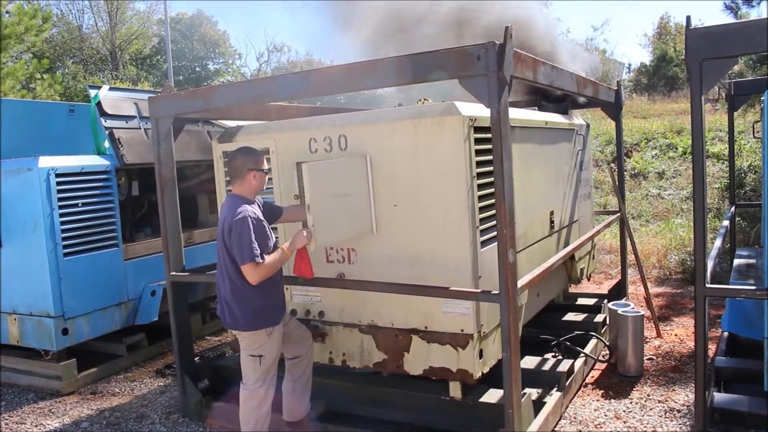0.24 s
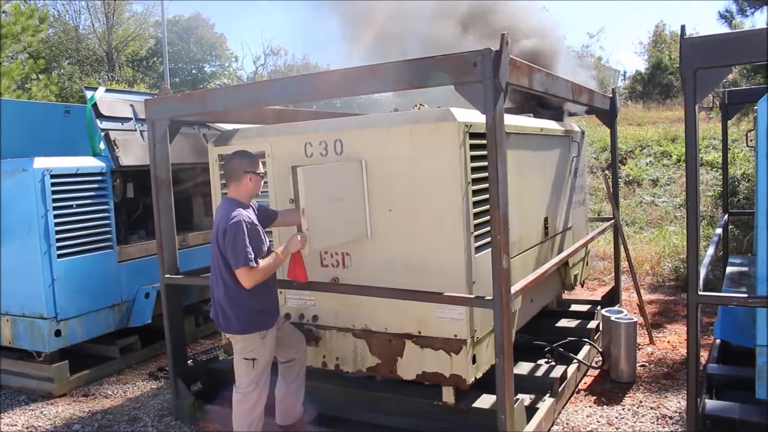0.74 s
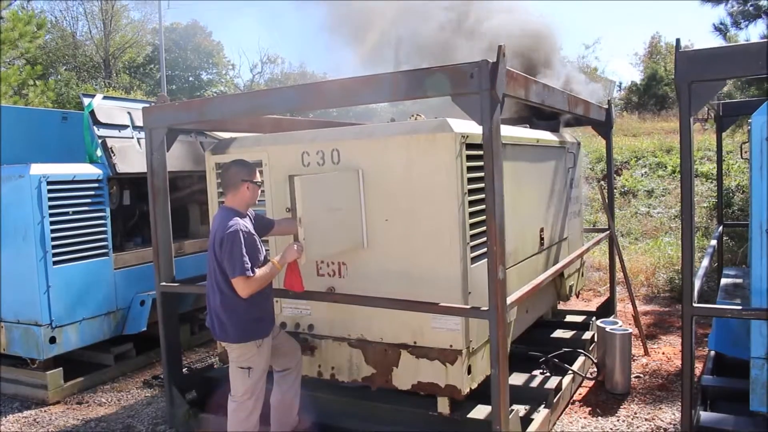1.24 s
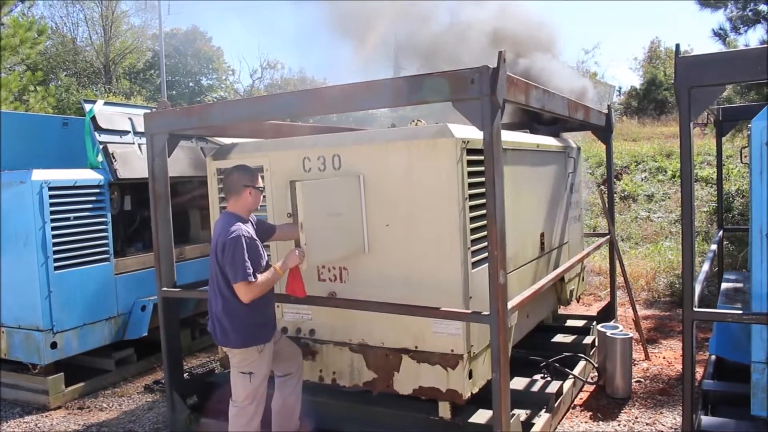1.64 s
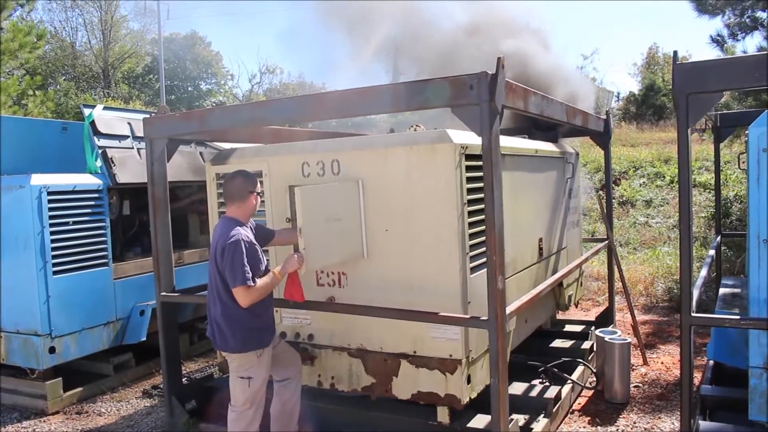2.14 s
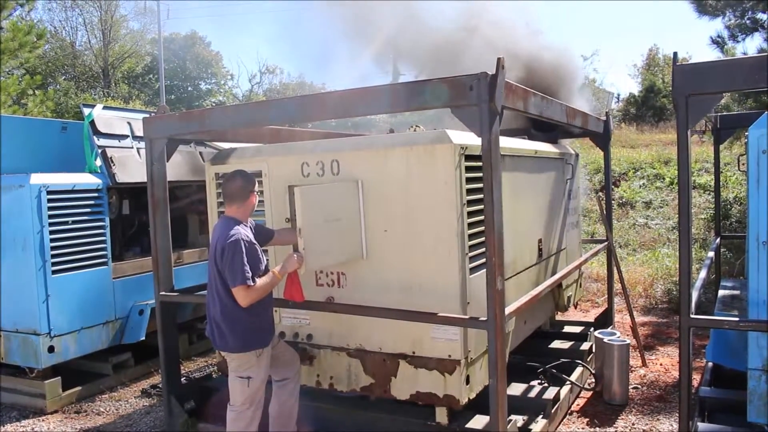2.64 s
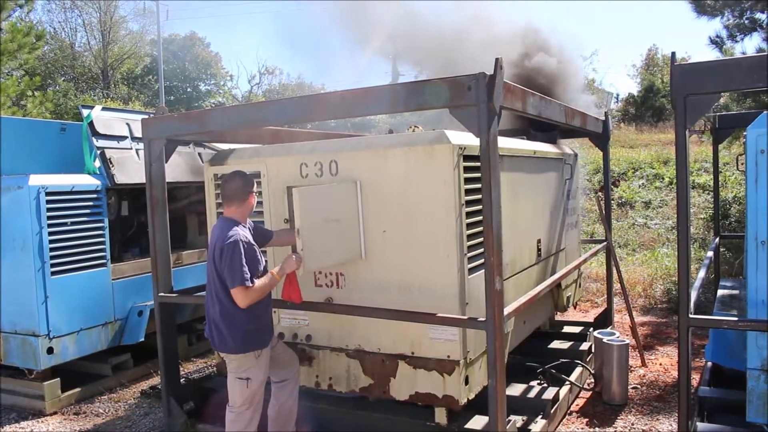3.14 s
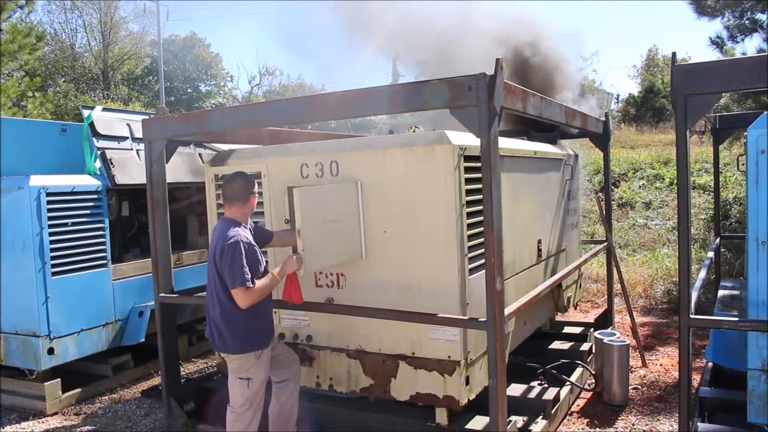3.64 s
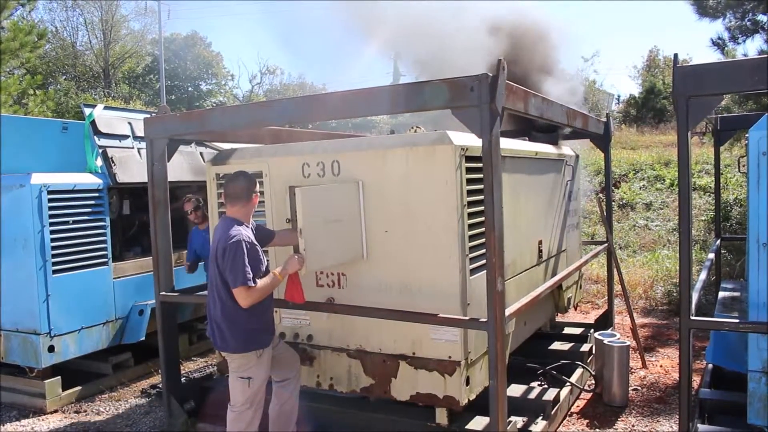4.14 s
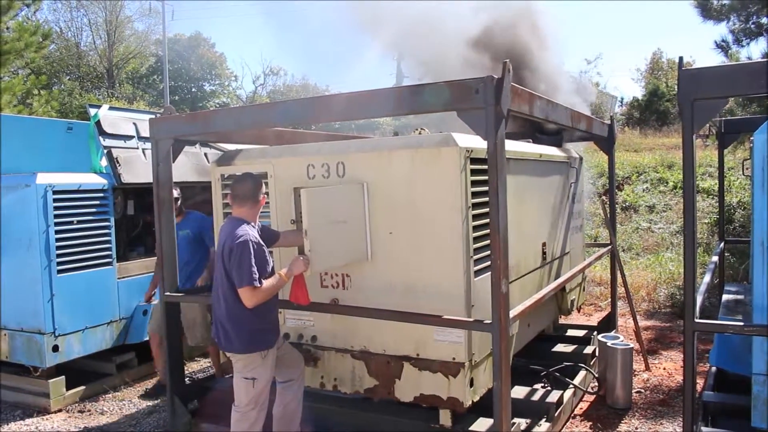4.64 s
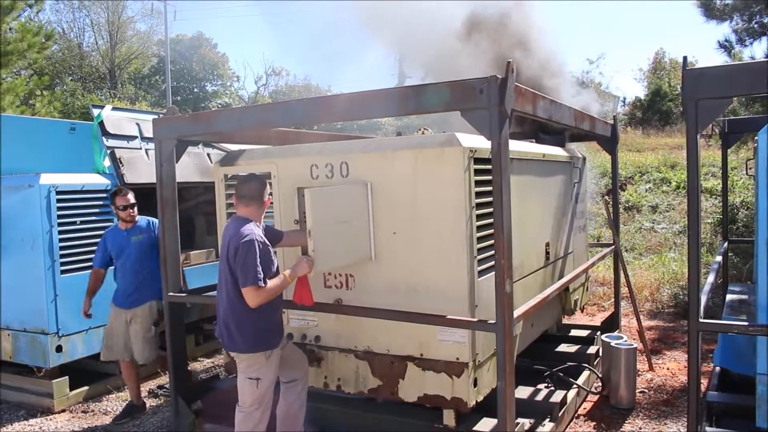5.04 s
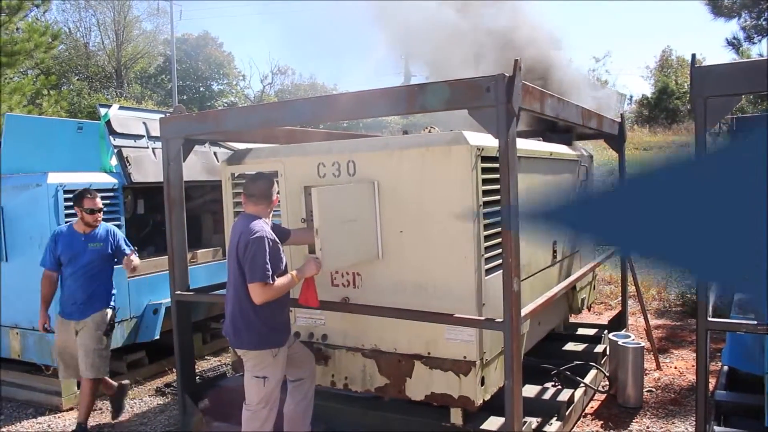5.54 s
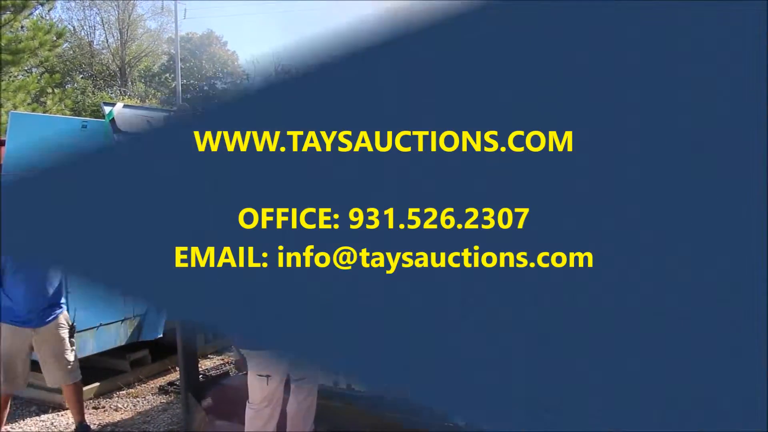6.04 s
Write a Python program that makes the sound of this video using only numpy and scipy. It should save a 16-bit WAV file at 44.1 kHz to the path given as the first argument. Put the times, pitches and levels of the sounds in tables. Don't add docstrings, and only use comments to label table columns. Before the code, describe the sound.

Steady rough diesel engine drone with gear hum, metallic knocks and fan roar in an open yard, gusts thumping, gradually fading towards silence.

```python
import sys
import numpy as np
from scipy import signal
from scipy.io import wavfile
from scipy.ndimage import uniform_filter1d

SR = 44100
rng = np.random.default_rng(int(sys.argv[2]) if len(sys.argv) > 2 else 0)


def convert_level_to_amplitude(level_db):
    exponent = np.asarray(level_db, float) / 20
    return 10 ** exponent


def bounce(signal):
    frames = np.transpose(np.atleast_2d(signal))
    limited = np.clip(frames, -1, 1)
    pcm = np.round(limited * 32767).astype(np.int16)
    wavfile.write(sys.argv[1], SR, pcm)


N = 276939


def evened(x):
    return x / np.sqrt(np.mean(abs(x) ** 2) + 1e-20)


def read(points, hz):
    f, value = np.transpose(points)
    return np.interp(np.log(hz + 1), np.log(f + 1), value)


def curve(rows):
    return np.interp(np.arange(N) / SR, *np.transpose(rows))


def drift(hz, count):
    steps = N // 64 + 2
    z = rng.standard_normal((count, steps)) + 1j * rng.standard_normal((count, steps))
    smoothing = 1 + (np.fft.fftfreq(steps, 64 / SR) / hz) ** 2
    z = np.fft.ifft(np.fft.fft(z) / smoothing)
    return [np.interp(np.arange(N) / 64, np.arange(steps), evened(row)) for row in z]


def coloured(x, points, patchy_db=0., size=2048):
    hz, t, z = signal.stft(x, SR, nperseg=size, noverlap=size * 3 // 4)
    patches = rng.standard_normal(z.shape[-2:])
    patches = uniform_filter1d(patches, size=12, axis=0)
    patches = evened(uniform_filter1d(patches, size=8, axis=1))
    gain = convert_level_to_amplitude(read(points, hz)[:, None] + patchy_db * patches) * np.sqrt(SR / 2)
    return signal.istft(z * gain, SR, nperseg=size, noverlap=size * 3 // 4)[1][..., :N]


def ring(x, hz, width_hz):
    r = np.exp(-np.pi * width_hz / SR)
    return 2 * signal.lfilter([1 - r], [1, -r * np.exp(2j * np.pi * hz / SR)], x).real


def tones(table, cycles, pulse_at, waver_hz, followers=0., free_above=100):
    out, luck = np.zeros(N), rng.random(len(table))
    for (order, db, loose), waver, chance in zip(table, drift(waver_hz, count=len(table)), luck):
        order = np.round(order * 3) / 3
        next_cylinder = np.exp(-2j * np.pi * order / 6)
        pipe_bump = np.exp(-((order - 17) / 4.2) ** 2 - 2j * np.pi * order * .2925)
        pipe_echo = -1.6 * pipe_bump
        muffler_lag = np.exp(-1.3j * followers * np.exp(-((order - 6.5) / 1.2) ** 2))
        pulses = muffler_lag * ((order / 13) ** 2 + followers * (next_cylinder + pipe_echo))
        size = np.sqrt(1 - .7 * loose) + np.sqrt(.7 * loose + .05) * waver
        start = chance * (order > free_above)
        turn = np.exp(2j * np.pi * (order * (cycles - pulse_at) + start))
        out -= np.sqrt(2) * convert_level_to_amplitude(db) * (size * pulses / abs(pulses) * turn).real
    return out


def strikes(parts, cycles, spread_db):
    out, repeats = np.zeros(N), np.arange(-1, int(cycles[-1] / 3) + 1)
    for (hz, t60), pattern in parts:
        blows = np.zeros(N)
        for place, db in pattern:
            luck = rng.standard_normal((len(repeats), 2))
            place_now = 3 * repeats + place + .006 * luck[:, 0]
            at = np.interp(place_now, cycles, np.arange(N), -1, -1).astype(int)
            heard = at > 0
            blows[at[heard]] = convert_level_to_amplitude(db + spread_db * luck[heard, 1])
        t = np.arange(int(t60 * SR)) / SR
        swell = 1 - np.exp(-t / .004)
        shape = convert_level_to_amplitude(-60 * t / t60) * swell * np.sin(2 * np.pi * hz * t)
        out += signal.oaconvolve(blows, shape)[:N]
    return out


# (time_s, speed_cycles_per_s)
ENGINE_SPEED = [
    (0, 11.719),
    (1.0, 11.715),
    (2.2, 11.743),
    (3.4, 11.675),
    (4.0, 11.678),
    (6.28, 11.622),
]


def engine_cycles():
    return np.cumsum(curve(ENGINE_SPEED)) / SR


# (multiple_of_cycle_rate, level_db, unsteady_share_0_to_1)
EXHAUST = [(2, -29, 0), (4, -23, 0), (6, -21, 0), (8, -18, .3), (10, -16, .1), (12, -11, 0), (14, -21, .3),
           (16, -13, 0), (18, -13, .1), (20, -18, .1), (22, -19, .1), (24, -21, .6), (26, -21.5, .3),
           (30, -23, .4), (32, -24, .7), (36, -29, .1), (40, -22, .2), (44, -32, .7), (46, -36, .1),
           (48, -33, .7)]
# (multiple_of_cycle_rate, level_db, unsteady_share_0_to_1)
UNEVEN_FIRING = [(5, -27, 0), (7, -26, .3), (9, -33, 0), (11, -26, .3), (17, -21, .1), (21, -20.5, .7),
                 (23, -18, .3), (27, -26, .6), (29, -20, .3), (35, -25, 1), (37, -30, .9), (45, -34, .6)]


def exhaust_beats(cycles):
    return tones(EXHAUST + UNEVEN_FIRING, cycles, pulse_at=.4575, waver_hz=.7, followers=1., free_above=27)


# (multiple_of_cycle_rate, level_db, unsteady_share_0_to_1)
COMPRESSOR = [(6.667, -33, 0), (10.667, -27, 0), (13.333, -30, 0), (14.667, -23, 0), (15.333, -23, 0),
              (16.667, -21, 0), (17.333, -27, .2), (18.667, -27, .2), (19.333, -27, .2), (20.667, -26, .2),
              (21.333, -25, 0), (22.667, -28, .2), (26.667, -27, 0), (39.667, -34, .3), (40.333, -32, .6),
              (54.333, -29, .4), (69.667, -26, .3), (85.333, -29, .3)]


def compressor_hum(cycles):
    return tones(COMPRESSOR, cycles, pulse_at=0, waver_hz=.7, free_above=0)


# (multiple_of_cycle_rate, level_db, unsteady_share_0_to_1)
HOUSING = [(54.0, -22, 0.4), (56.0, -25, 0.4), (58.0, -26, 0.3), (62.0, -24, 0.4), (64.0, -23, 0.4),
           (70.0, -21, 0.4), (72.0, -21, 0.6), (86.0, -28, 0.7), (98.0, -31, 0.7)]


def housing_buzz(cycles):
    lower = tones(HOUSING[:3], cycles, pulse_at=.31, waver_hz=2)
    return lower + tones(HOUSING[3:], cycles, pulse_at=.45, waver_hz=2)


# [(place_cycles, level_db)])
KNOCKS = [
    ((640, .1), [(.29, -6), (.78, -8), (1.76, -4), (2.28, -9)]),
    ((790, .037), [(.29, 1), (.53, 1), (.8, -8), (1.03, -6), (1.79, 0), (2.02, 0), (2.43, -3), (2.78, 5), (2.93, 2)]),
    ((1050, .025), [(.38, -3), (1.23, 2), (1.73, 3), (1.8, -2), (2.73, 3)]),
    ((400, .04), [(.33, -7), (1.17, -3)]),
]


def knocks(cycles):
    return strikes(KNOCKS, cycles, spread_db=2)


# [(place_cycles, level_db)])
CLANK = [
    ((770, .035), [(1.27, 11)]),
    ((820, .04), [(1.3, 5), (1.41, 8)]),
]
# (time_s, level_db)
CLANK_FORCE = [(.11, -3), (.37, 2), (.63, 1), (.9, 0.5), (1.15, -2), (1.45, -4), (1.9, 0.5), (2.4, -1),
               (3.2, 0.5), (3.95, -3), (4.5, -1), (5.7, 1.5), (6.0, -10)]


def loose_clank(cycles):
    return convert_level_to_amplitude(curve(CLANK_FORCE)) * strikes(CLANK, cycles, spread_db=.5)


# (pitch_hz, level_db_per_hz)
RUMBLE = [(20, -52), (35, -50), (70, -45), (110, -40), (160, -37), (200, -34), (260, -33), (340, -32)]
# (pitch_hz, level_db_per_hz)
PANELS = [(420, -36.5), (510, -43), (620, -37), (720, -37.5), (820, -37), (900, -36.5), (1300, -41)]
# (pitch_hz, level_db_per_hz)
FAN = [(1300, -40), (1650, -44), (1950, -40.5), (2400, -41.5), (3000, -44.5), (3600, -47), (4300, -47)]
# (pitch_hz, level_db_per_hz)
FAN_HISS = [(5200, -45.5), (6000, -50), (7000, -53.5), (9000, -57), (11500, -63), (14000, -72.1)]
# (pitch_hz, level_db_per_hz)
AIR_EDGE = [(15150, -74), (15300, -87), (17000, -95)]
# (pitch_hz, level_db_per_hz)
VALVES = [(3000, -85), (5000, -49), (8000, -53.5), (12000, -75), (15200, -88)]


def roar(cycles):
    flicker = convert_level_to_amplitude(0.17 * drift(33, count=1)[0].real)
    firings_db = .25 * np.cos(2 * np.pi * 6 * (cycles - .31))
    cycle_db = .2 * np.cos(2 * np.pi * (cycles - .33))
    flicker *= convert_level_to_amplitude(firings_db + cycle_db)
    puffs = np.exp(4.0 * (np.cos(2 * np.pi * 2 * (cycles - .44)) - 1))
    low = RUMBLE + PANELS + [(1500, -71)]
    high = [(1100, -49.5)] + FAN + FAN_HISS + AIR_EDGE
    white = rng.standard_normal((3, 2, N))
    rumble = coloured(white[0], low, patchy_db=1.5, size=4096)
    hiss = coloured(white[1], high, patchy_db=0.87, size=1024)
    return rumble + flicker * hiss + puffs * coloured(white[2], VALVES)


# (pitch_hz, level_db)
PANEL_RINGS = [(969, -19), (1141, -26), (1249, -27), (1960, -25), (2153, -23), (2455, -29), (2735, -31),
               (3165, -30.5), (3618, -33), (3876, -36), (4285, -33), (4651, -32), (4823, -32), (4910, -29)]
# (pitch_hz, level_db)
GEAR_RINGS = [(5125, -28), (5405, -30), (5599, -29.5), (5792, -35), (6072, -35), (6481, -39), (6675, -40),
              (6977, -38), (7429, -37), (7903, -40), (8140, -41), (8398, -40), (8764, -42), (8915, -41)]
# (pitch_hz, width_hz, level_db)
WHINE = [(2210, 26, -28), (749, 26, -23.5)]


def rings():
    white, out = rng.standard_normal((2, N)), np.zeros((2, N))
    table = [(hz, 35, db) for hz, db in PANEL_RINGS + GEAR_RINGS] + WHINE
    for (hz, width_hz, db), swell in zip(table, drift(1.0, count=len(table))):
        level = convert_level_to_amplitude(db + 3 * (hz > 1500) + 2.1 * swell.real)
        out += level * evened(ring(ring(white, hz, width_hz), hz, width_hz))
    return out


# (pitch_hz, likeness_0_to_1)
LIKENESS = [(100, 1), (300, 1), (700, .98), (1300, 0.93), (2400, 0.84), (4400, 0.66), (8000, 0.65),
            (15000, 0.41)]


def ports(main, other):
    hz, t, z = signal.stft(np.array([main, other]), SR, nperseg=1024)
    same = np.clip(read(LIKENESS, hz), 0, 1)[:, None]
    mid, side = np.sqrt((1 + same) / 2) * z[0], np.sqrt((1 - same) / 2) * z[1]
    return signal.istft(np.array([mid + side, mid - side]), SR, nperseg=1024)[1][:, :N]


# (peak_s, level_db, length_s)
GUSTS = [(.55, -20, 0.22), (.8, -16.5, 0.29), (1.026, -10.5, 0.21), (1.75, -30, .2), (2.2, -26, .3),
         (2.5, -23, 0.27), (2.92, -17, 0.36), (3.296, -8, 0.18), (3.55, -18, .2), (3.93, -14.5, 0.35),
         (4.25, -20, 0.27), (4.75, -19, .4), (5.17, -20, .25), (5.5, -16, 0.12), (5.77, -17, 0.2),
         (6.27, -23, .15)]


def gusts():
    t = np.arange(N) / SR
    calm_db, edge_db = -31.5, -6
    power = convert_level_to_amplitude(calm_db) ** 2
    for peak_s, db, length_s in GUSTS:
        power = power + convert_level_to_amplitude(db + edge_db * (2 * (t - peak_s) / length_s) ** 2) ** 2
    return np.sqrt(power)


# (pitch_hz, level_db_per_hz)
WIND_COLOUR = [(25, -48), (48, -22), (85, -13.5), (130, -20.5), (220, -27.5), (320, -50), (500, -43),
               (1000, -90)]


def wind():
    lumps = evened(convert_level_to_amplitude(6.5 * drift(24, count=1)[0].real)) * gusts()
    mid, side = coloured(rng.standard_normal((2, N)), WIND_COLOUR, size=1024) * lumps
    return convert_level_to_amplitude(1.5) * np.array([.45 * mid + side, .45 * mid - side])


def scene():
    cycles = engine_cycles()
    beats = exhaust_beats(cycles) + compressor_hum(cycles) + housing_buzz(cycles)
    beats += knocks(cycles) + loose_clank(cycles)
    noise = roar(cycles) + rings()
    left_db = 0.22
    machine = ports(beats * convert_level_to_amplitude(-0.13) + noise[0], noise[1])
    return machine * convert_level_to_amplitude([[left_db / 2], [-left_db / 2]]) + wind()


def roll_off(x):
    return signal.sosfilt(signal.butter(12, 15730, fs=SR, output="sos"), x)


def record(dry):
    start_db, silent_at_s, bend = -31.5, 6.825, 1.142
    fade = 1 - (np.arange(N) / SR / silent_at_s) ** bend
    return roll_off(dry * convert_level_to_amplitude(start_db) * fade)


dry = scene()
out = record(dry)
bounce(out)
```